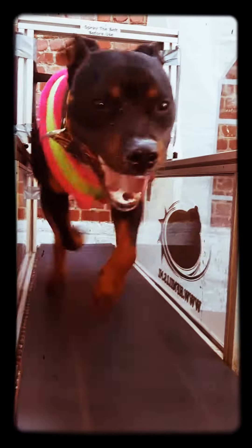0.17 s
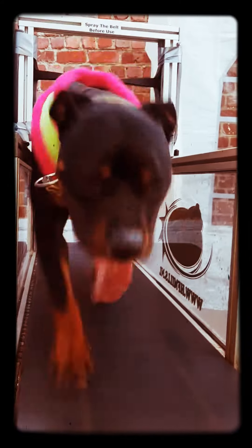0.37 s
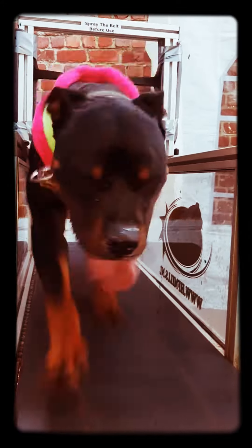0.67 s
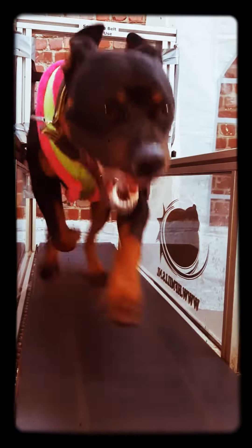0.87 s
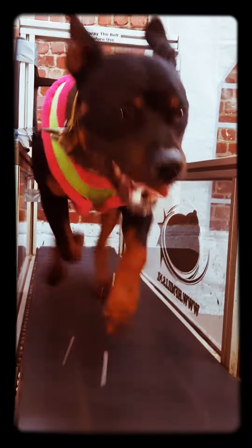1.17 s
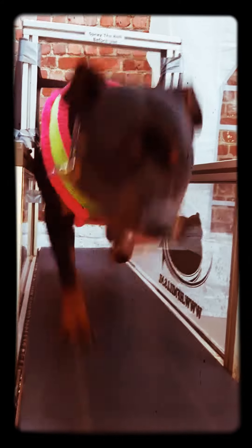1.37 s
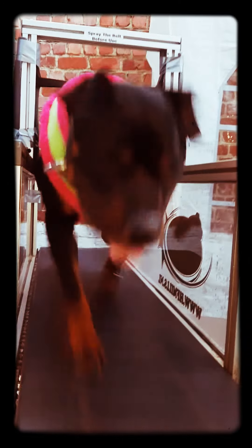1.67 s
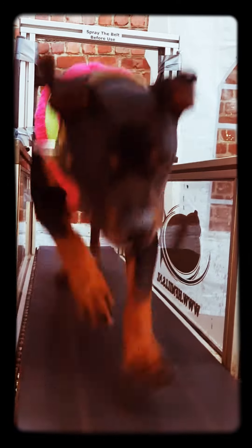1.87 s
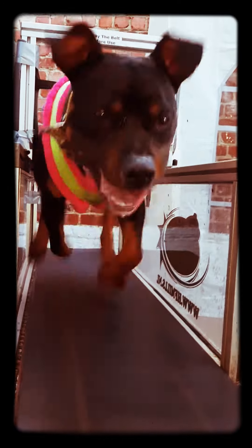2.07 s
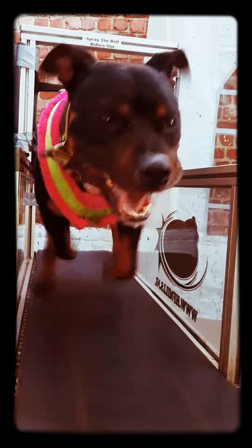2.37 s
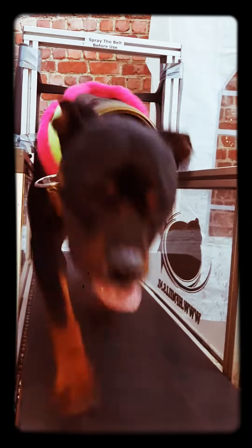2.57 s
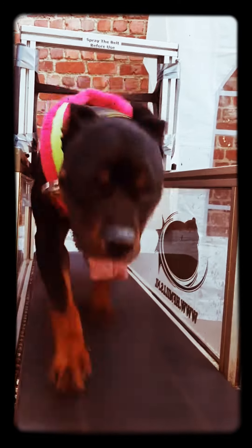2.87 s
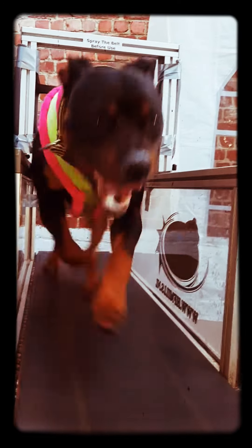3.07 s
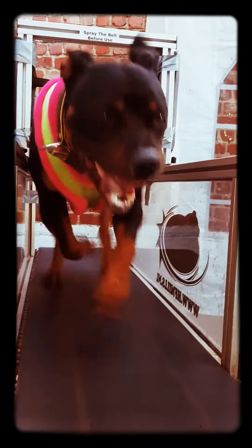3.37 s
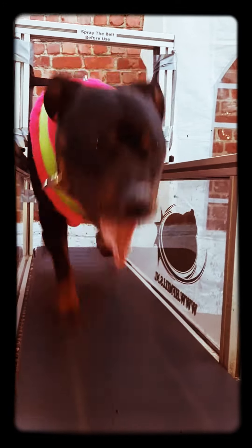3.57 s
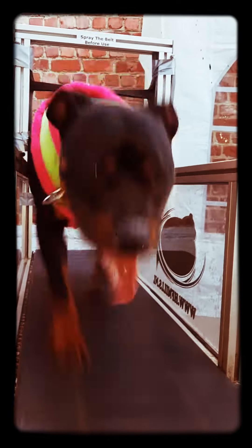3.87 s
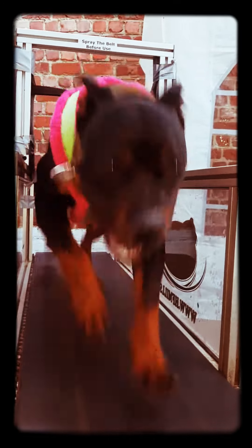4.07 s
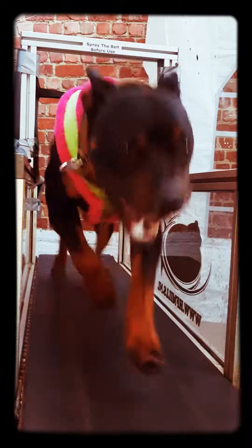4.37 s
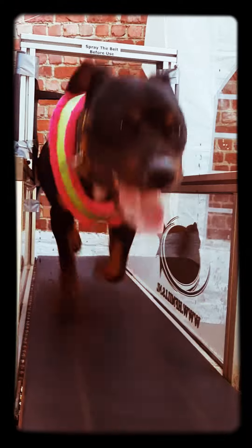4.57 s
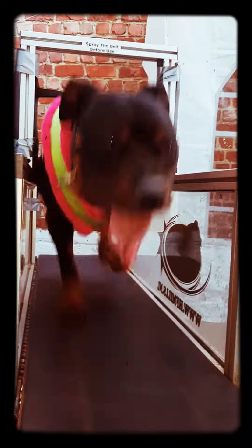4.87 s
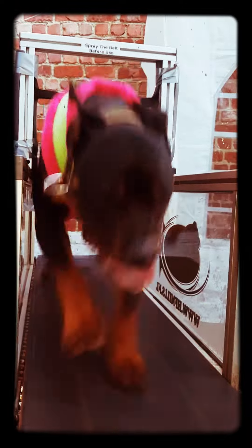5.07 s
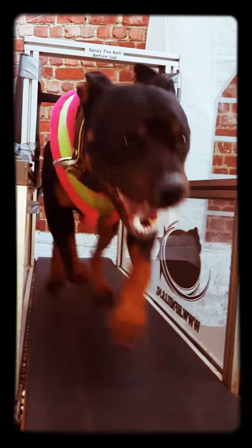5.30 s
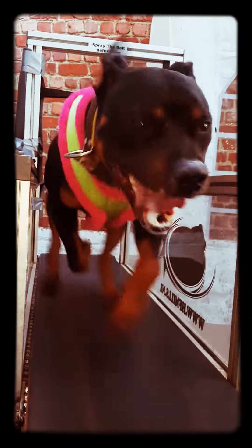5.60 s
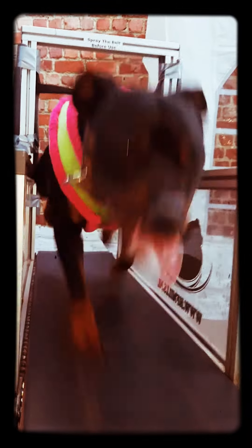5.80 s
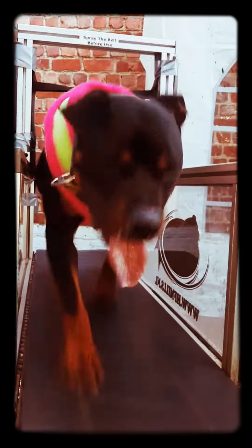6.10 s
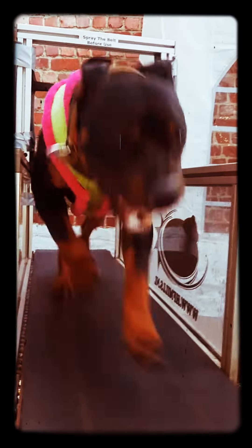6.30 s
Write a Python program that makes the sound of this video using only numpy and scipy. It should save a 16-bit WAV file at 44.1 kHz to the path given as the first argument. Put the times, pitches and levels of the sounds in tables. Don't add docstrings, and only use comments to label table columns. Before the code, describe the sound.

For about 6.4 seconds a dog gallops steadily on a slatted treadmill in a small brick-walled space, close to a phone. The sound is already in full motion at 0 s and never stops. Roughly every 0.3 s a stride surges: low-mid frame drone and wheel hiss build quickly, then fall away as the paws leave. Landings set off dry, bright slat cracks with tiny rattles, plus blunt paw thumps and short scuffs; thumps are prominent between 0.6 and 3 s. Strong clack clusters come around 1.6-2.6 s, the sharpest near 3.9, 4.1-4.2, 4.8 and 5.73 s, where a pad drag also scrapes. Very fast faint ticking fills between. A soft rail ring sounds at 0.4, 2.5 and 3.8 s; a thin high harness jingle flickers often, clearer before 4 s. Faint building rumble, short room tail, little bass; it ends mid-stride.

```python
import sys
import numpy as np
from scipy import signal
from scipy.fft import rfft, irfft
from scipy.io import wavfile
from scipy.ndimage import uniform_filter1d

SR = 44100
rng = np.random.default_rng(int(sys.argv[2]) if len(sys.argv) > 2 else 0)


def wav_record(signal):
    frames = np.transpose(np.atleast_2d(signal))
    bounded = np.clip(frames, -1, 1)
    quanta = np.round(bounded * 32767).astype(np.int16)
    wavfile.write(sys.argv[1], SR, quanta)


def ratio(d):
    e = np.asarray(d, float) / 20
    return 10 ** e


N = 284004
SLAT_HZ, EDGE_RING_HZ = 2725, 5640


def evened(x):
    return x / np.sqrt(np.mean(x ** 2) + 1e-20)


def read(points, hz):
    f, value = np.transpose(points)
    return np.interp(np.log(hz + 1), np.log(f + 1), value)


def colour(points):
    log_gain = np.log(ratio(read(points, abs(np.fft.fftfreq(4096, 1 / SR)))))
    return np.fft.ifft(np.exp(np.conj(signal.hilbert(log_gain)))).real[:1024]


def coloured(x, points):
    return evened(signal.oaconvolve(x, colour(points)[None])[:, :N]) if len(x) else x


def resonate(x, hz, width_hz):
    return signal.lfilter(*signal.iirpeak(hz, hz / width_hz, SR), x)


def filtered(x, order, edge_hz, kind):
    return signal.sosfilt(signal.butter(order, edge_hz, kind, fs=SR, output="sos"), x)


def ports(x, other, least=0):
    # (frequency [Hz], shared power [0-1])
    alike = [(60, 0.6), (250, 0.98), (600, 0.72), (1400, 0.27), (3000, 0), (6500, 0), (9000, 0.34),
             (15000, 0)]
    # (frequency [Hz], phase [radians])
    trail = [(0, 0), (780, .9), (1810, .9), (2500, 2.8), (2930, 3.8), (3900, 4.8), (5250, 5.4), (6980, 6.4),
             (9220, 9.6), (12000, 12.4), (16100, 18)]
    hz = np.fft.rfftfreq(N, 1 / SR)
    share = np.sqrt(np.clip(read(alike, hz), min(least, .99), 1))
    pair = share * rfft(x) + np.sqrt(1 - share ** 2) * rfft(other)
    late = np.exp(-1j * np.interp(hz, *np.transpose(trail)) * np.array([[1], [0]]))
    # (frequency [Hz], level [dB])
    lean = [(100, 1.0), (400, 0.59), (1200, 0.33), (5000, 0), (9000, 0.43)]
    lean_db = read(lean, hz) * np.array([[1], [-1]])
    return irfft(pair * late * ratio(lean_db), N)


def knocks(per_s, spread_db):
    size_db = spread_db * np.minimum(rng.exponential(1, (3, N)), 5)
    size = ratio(size_db) * rng.choice([-1., 1.], (3, N))
    return evened(size * (rng.random((3, N)) < per_s / SR))


def patchy(x, patchy_db):
    z = signal.stft(x, nperseg=512)[2]
    patches = uniform_filter1d(rng.standard_normal(z.shape[1:]), size=5, axis=0)
    patches = uniform_filter1d(patches, size=6, axis=1)
    return signal.istft(z * ratio(patchy_db * evened(patches)), nperseg=512)[1][:, :N]


def slat_rings():
    # (time [s],
    # body level [dB], body pitch [Hz], edge level [dB], edge pitch [Hz])
    strong = [(0.0098, -13.5, 3240, -12.5, 4520), (0.021, -15, 2860, -12.5, 4370),
              (0.0759, -16, 2970, -14.5, 4750), (0.3328, -9, 3100, -9.5, 4850), (0.6621, -9, 3170, -8, 4400),
              (1.3032, -17, 2800, -12, 5840), (1.3917, -11.5, 3000, -12.5, 6200),
              (1.6193, -11, 3820, -11.5, 6330), (1.6843, -10.5, 2700, -12.5, 6640),
              (1.6956, -12, 3010, -11, 6760), (1.9308, -8.5, 3770, -9.5, 4560),
              (1.9413, -13, 2800, -13.5, 5000), (1.9929, -11.5, 3060, -8.5, 5230),
              (2.1921, -11, 2880, -11, 4800), (2.2532, -14, 2710, -10.5, 6330), (2.303, -13, 3500, -14, 4310),
              (2.3135, -9, 3350, -12, 5800), (2.3244, -11.0, 2760, -8, 6600), (2.5257, -16, 3220, -10, 4700),
              (2.6123, -12.5, 3170, -12.0, 4690), (2.6191, -17.0, 3880, -12.5, 4780),
              (2.63, -11.5, 2720, -13.5, 4570), (2.8558, -16, 2950, -11.5, 4500),
              (2.8644, -16, 3080, -12.5, 6460), (2.935, -13, 3140, -12.5, 4690),
              (3.2729, -15.5, 4180, -12.5, 4670), (3.4993, -15, 2800, -18, 4500),
              (3.8071, -11.5, 3040, -8.5, 6100), (3.8188, -10.5, 2840, -14, 4700),
              (3.8798, -6.5, 2900, -6.5, 6720), (3.9036, -12.5, 2880, -11.5, 6400),
              (4.1225, -6, 2900, -7, 5080), (4.1322, -11, 2830, -15, 6440), (4.1953, -7.5, 2800, -10.5, 4610),
              (4.207, -15.5, 3060, -12.5, 5550), (4.5294, -11, 2710, -11, 6430), (4.7802, -7, 3160, -8, 6500),
              (5.7214, -11.5, 2750, -9, 6330), (5.7344, -5, 3460, -6.5, 5060),
              (6.3833, -14.5, 2620, -10.5, 7300),
              (0.0679, -17, 2950, -17.5, 5300), (0.0722, -18.0, 3140, -14, 7190),
            (0.0851, -14.5, 2720, -17.0, 6800), (0.268, -16.5, 2920, -21, 4740),
            (0.4097, -18, 2820, -16.5, 5430), (0.6736, -17, 2860, -16, 4650),
            (0.7529, -15.5, 2930, -13.5, 6600), (0.8059, -14.5, 2830, -14, 6700),
            (1.0594, -16, 2900, -17, 4750), (1.3672, -12.5, 2800, -14.5, 5510),
            (1.6874, -17, 3100, -12.5, 4780), (1.921, -18, 2890, -14.5, 5680),
            (2.265, -16.0, 2890, -22, 6980), (2.307, -18, 4150, -15, 4390),
            (2.5027, -14.5, 2760, -17, 6030), (2.5365, -10.5, 2760, -12, 6500),
            (2.6087, -22, 2840, -13, 4600), (2.7368, -13.5, 2780, -16, 4740),
            (2.8184, -13.5, 2910, -14, 6550), (2.8763, -12.5, 3060, -15.5, 6370),
            (2.9252, -15.5, 3060, -22, 6840), (2.9465, -15.5, 3680, -15, 6240),
            (3.0749, -13.5, 2860, -19, 6700), (3.4388, -16, 2840, -17, 6200), (3.571, -14, 3820, -13, 6760),
            (3.5792, -14, 3830, -15, 5600), (3.8727, -16, 2930, -17.5, 6630),
            (3.8926, -13, 2890, -12.5, 4610), (3.9145, -17, 2800, -17, 6720), (4.113, -20, 3140, -17, 6120),
            (4.3804, -12, 2800, -14.5, 4830), (4.4446, -17, 2950, -15.5, 4310),
            (4.8544, -15.0, 2840, -20.5, 4390), (5.1641, -14.0, 2860, -14, 5430),
            (5.4196, -13.5, 2890, -12, 4420), (5.609, -17, 2790, -19.5, 4460),
            (5.7245, -12, 2800, -13, 5450), (5.746, -25, 2930, -23, 6370),
            (6.1476, -19.5, 2870, -21.0, 4540), (6.3952, -18.5, 2800, -22.0, 4520)]
    # (time [s], body level [dB], edge level [dB])
    ticks = [(0.0987, -20, -16), (0.1638, -18, -20.5), (0.1907, -27, -27), (0.2558, -19.5, -22),
             (0.3244, -19.0, -20), (0.345, -19, -26), (0.4015, -17, -16), (0.4636, -26, -31),
             (0.4765, -21, -23), (0.6557, -23, -23), (0.7231, -22, -32), (0.727, -17, -17.5),
             (0.9088, -27, -34), (1.0029, -17.5, -21.5), (1.0697, -16, -21.5), (1.083, -24, -23.5),
             (1.136, -24.5, -22), (1.1617, -20, -19.5), (1.1744, -29, -26), (1.2664, -31, -33),
             (1.2928, -21, -27), (1.3164, -24, -28.5), (1.3723, -24, -22), (1.3797, -24, -25.0),
             (1.4681, -17, -16), (1.4806, -31, -23), (1.6094, -32, -21), (1.6445, -23, -29.0),
             (1.7073, -16.5, -16), (1.7189, -19.5, -17), (1.7568, -21, -20), (1.7934, -21, -21),
             (1.8815, -23, -30), (1.9145, -26, -18.0), (2.0411, -26, -28), (2.0561, -32, -29.5),
             (2.0681, -30, -26.0), (2.0812, -27, -26), (2.2973, -31, -19.5), (2.3844, -29, -22.5),
             (2.3974, -27, -22.5), (2.4086, -21, -21), (2.445, -33, -32), (2.5149, -20, -23.5),
             (2.5606, -27, -23), (2.5723, -22.0, -26.0), (2.7837, -17, -16.5), (2.7952, -21.0, -21),
             (2.8301, -23, -23.5), (2.9143, -19.0, -16), (2.9824, -28, -30.0), (3.006, -26, -25.5),
             (3.0395, -22, -19), (3.0637, -19.0, -19), (3.1337, -21, -24), (3.1451, -25, -25),
             (3.1564, -36, -29), (3.1665, -36, -31), (3.1766, -30.0, -25), (3.1903, -20, -17.5),
             (3.241, -21, -19), (3.3094, -19.5, -20.5), (3.3566, -25, -31.0), (3.3679, -20.5, -25),
             (3.4034, -21, -19.5), (3.4515, -32, -25), (3.4848, -22.5, -23.5), (3.5104, -21, -24),
             (3.5221, -28.0, -24), (3.5617, -15.5, -18), (3.6424, -27.0, -24), (3.6526, -24, -25),
             (3.6647, -25, -22), (3.6765, -21, -21), (3.6887, -27, -24.5), (3.952, -22, -20),
             (3.9649, -16, -17), (3.988, -19, -21.5), (4.0734, -18, -21), (4.189, -14.5, -17),
             (4.4282, -27, -32.0), (4.4385, -17.5, -23), (4.4563, -17, -22), (4.5136, -31, -19),
             (4.5188, -20, -19), (4.607, -29.0, -33.0), (4.6185, -30.0, -33.5), (4.7053, -24, -21),
             (4.7314, -23.0, -24), (4.7728, -20, -17.5), (4.7926, -28, -24), (4.8348, -15, -16),
             (4.8444, -15, -18.5), (4.9573, -22.5, -24), (5.022, -19.5, -23.5), (5.0859, -22, -20.5),
             (5.1104, -18, -24), (5.1753, -12.5, -14), (5.1868, -23, -19.5), (5.2901, -26.5, -26),
             (5.4308, -30, -24), (5.5843, -31, -37.0), (5.6849, -22, -21.5), (5.712, -31, -29.5),
             (5.7984, -18, -14.5), (5.8096, -17, -21), (5.8231, -19, -25), (5.873, -19.5, -18),
             (5.8986, -21.5, -24), (5.912, -25.0, -29.0), (5.987, -18, -19), (6.0615, -29, -26),
             (6.1283, -18.5, -16.5), (6.1364, -15, -19.5), (6.211, -19.5, -24.5), (6.2224, -18.0, -17),
             (6.2476, -20, -24), (6.26, -26, -22.5), (6.2972, -23, -28), (6.31, -22, -23)]
    edge_spread = 0.18
    light = []
    for k, (s, body_db, edge_db) in enumerate(ticks):
        edge_hz = EDGE_RING_HZ * (1 + edge_spread * np.sin(k * k))
        light.append((s, body_db, SLAT_HZ, edge_db, edge_hz))
    return strong + light


def slat_claps():
    return [(row[0], max(row[1], row[3]) + 5) for row in slat_rings()]


def load_db():
    # (paws off the belt [s], light load [dB], hardest push [s], full load [dB])
    strides = [(-.13, -30, .07, -28.5), (.18, -40.5, .4, -30), (.53, -40.5, .71, -31),
               (.86, -41, 1.06, -31.5), (1.16, -43, 1.35, -29.5), (1.47, -40.5, 1.66, -30),
               (1.771, -40, 1.98, -29), (2.1, -38.5, 2.3, -29), (2.39, -39.5, 2.6, -29),
               (2.709, -37, 2.92, -28.5), (3.01, -41, 3.25, -28.5), (3.32, -40.5, 3.58, -30),
               (3.65, -43, 3.88, -30.5), (3.98, -43, 4.18, -30.5), (4.29, -42.5, 4.53, -32),
               (4.61, -47.5, 4.82, -33), (4.96, -43, 5.17, -32.5), (5.25, -49.5, 5.46, -30.5),
               (5.6, -40.5, 5.79, -30.5), (5.88, -39.5, 6.13, -30), (6.249, -42.5, 6.44, -29)]
    rise_curve, fall_curve = 0.34, 1.64
    jolt_db, jolt_s = 4, 0.0026
    t = np.arange(N) / SR
    last = (strides[-1][2] + .1, strides[-1][1], 9, 0)
    off, light_db, push, full_db = np.transpose(strides + [last])
    k = np.searchsorted(off, t, "right") - 1
    up = np.clip((t - off[k]) / (push[k] - off[k]), 0, 1) ** rise_curve
    down = np.clip((t - push[k]) / (off[k + 1] - push[k]), 0, 1) ** fall_curve
    blows = np.zeros(N)
    for s, db in slat_claps():
        blows[min(round(s * SR), N - 1)] += ratio(db)
    u = np.arange(4000) / SR / jolt_s
    jolt = np.tanh(2 * signal.oaconvolve(blows, u * np.exp(1 - u))[:N])
    rise_db = (full_db[k] - light_db[k]) * up
    fall_db = (light_db[k + 1] - full_db[k]) * down
    return light_db[k] + rise_db + fall_db + jolt_db * (jolt - .3)


def passing():
    gap_s, tick_db, spread_db = 0.0124, -32, 8
    s = np.cumsum(gap_s * rng.uniform(.9, 1.1, size=600))
    s = s[s < N / SR]
    chance = np.minimum(rng.standard_normal(len(s)), 1)
    db = tick_db + 1.0 * (load_db()[(s * SR).astype(int)] + 29) + spread_db * chance
    return list(zip(s, db))


def crack_halves():
    # (frequency [Hz], level [dB])
    crack = [(150, -29), (500, -17.5), (1200, -8.5), (2000, -37), (2700, 8.5), (4500, 16), (7000, 9),
             (8200, -9.5), (12000, -20), (16000, -58)]
    taps = colour(crack)[:256]
    halves = [filtered(taps, 2, 4200, side) for side in ("low", "high")]
    return [half / np.linalg.norm(half) for half in halves]


def clap(body_db, body_hz, edge_db, edge_hz, chance, halves):
    # (delay [s], level [dB])
    echoes = [(.0012, -10), (.0025, -9), (.0045, -14), (.0062, -18)]
    body_t60, edge_t60, ring_rise_s = 0.0044, 0.0031, .0005
    t = np.arange(1500) / SR
    taps = (ratio(body_db) * halves[0] + ratio(edge_db) * halves[1])[None]
    touch = (2 + chance[:3, :40]) * t[:40] * np.exp(-t[:40] / .00003)
    touch = touch / np.linalg.norm(touch, axis=1, keepdims=True)
    hit = np.zeros((3, 1500))
    hit[:, :295] = ratio(16.0) * signal.oaconvolve(touch, taps)
    rings = [(body_db, body_hz, body_t60), (edge_db, edge_hz, edge_t60)]
    for k, (ring_db, hz, t60) in enumerate(rings):
        detune = 1 + .03 * chance[:3, 100 + k, None]
        turn = 2 * np.pi * hz * t * detune + 3 * chance[:3, 110 + k, None]
        hit += ratio(ring_db + 9 - 60 * t / t60) * (1 - np.exp(-t / ring_rise_s)) * np.sin(turn)
    out = hit.copy()
    for k, (s, echo_db) in enumerate(echoes):
        for port in range(3):
            late = round(s * SR * (1 + .2 * np.tanh(chance[3, port + 3 * k])))
            out[port, late:] += ratio(echo_db) * hit[port, :1500 - late]
    rattle_db = -6.5 + .3 * (max(body_db, edge_db) + 12)
    rattle = signal.oaconvolve(chance[4:], taps)[:, :1500] * ratio(rattle_db)
    return out + rattle * (1 - np.exp(-t / .0005)) * ratio(-60 * t / .033)


def claps():
    halves = crack_halves()
    out = np.zeros((3, N + 1500))
    for s, *rings in slat_rings():
        at = round(s * SR)
        out[:, at:at + 1500] += clap(*rings, rng.standard_normal((7, 1500)), halves)
    shapes = []
    for chance in rng.standard_normal((40, 7, 1500)):
        body_hz = SLAT_HZ * (1 + .2 * abs(chance[3, 99]))
        edge_hz = EDGE_RING_HZ * (1 + .08 * chance[3, 98])
        shapes.append(clap(-25, body_hz, -28, edge_hz, chance, halves))
    for k, (s, db) in enumerate(passing()):
        at = round(s * SR)
        out[:, at:at + 1500] += ratio(db + 20) * shapes[k % 40]
    out = filtered(out, 1, 300, "high")
    return ports(out[0, :N], out[1:, :N], least=0.82)


def snaps():
    snap_db, growth = -5.5, 1.7
    out, t = np.zeros((3, N + 200)), np.arange(200) / SR
    for s, db in slat_claps():
        at = round(s * SR)
        burst = rng.standard_normal((3, 200)) * np.exp(-t / .0008)
        out[:, at:at + 200] += ratio(snap_db + growth * db) * burst
    out = filtered(out, 2, [7500, 14000], "band")
    return ports(out[0, :N], out[1:, :N])


def chatter():
    # (frequency [Hz], width [Hz], level [dB])
    slats = [(2250, 160, -3), (2530, 220, 0), (2900, 200, 2)]
    drive = knocks(per_s=630, spread_db=1.0)
    modes = sum(ratio(db) * resonate(drive, hz, width_hz) for hz, width_hz, db in slats)
    x = evened(modes) * ratio(-44.5 + 3.3 * (load_db() + 33))
    return ports(x[0], x[1:])


def paw_blows(rows, t60, rise_s, width_hz, gain_db):
    out, t = np.zeros((3, N + 3000)), np.arange(3000) / SR
    fade = np.cos(np.pi / 2 * t / t[-1])
    for s, db, hz in rows:
        grit = evened(resonate(rng.standard_normal((3, 3000)), hz, width_hz))
        at = round(s * SR)
        swell = ratio(db + gain_db - 60 * t / t60) * (1 - np.exp(-t / rise_s))
        out[:, at:at + 3000] += grit * swell * fade
    return ports(out[0, :N], out[1:, :N])


def paws():
    # (time [s], level [dB], pitch [Hz])
    thumps = [(0.076, -31, 500), (0.264, -13, 503), (0.551, -19, 358), (0.661, -9.5, 420),
              (0.704, -35, 450), (0.993, -7.5, 500), (1.056, -12, 444), (1.208, -29, 433),
              (1.299, -8.5, 393), (1.631, -4.5, 400), (1.69, -9, 404), (1.76, -19, 392), (1.911, -6, 396),
              (1.948, -8.5, 476), (2.129, -30, 358), (2.241, -12, 285), (2.298, -16, 312),
              (2.434, -36, 361), (2.481, -25, 304), (2.537, -9.5, 404), (2.616, -26, 566),
              (2.814, -29, 374), (2.91, -9, 392), (3.035, -38, 301), (3.081, -18, 404), (3.446, -17, 439),
              (3.496, -15, 537), (3.557, -40, 668), (3.748, -32, 382), (4.105, -18, 410), (4.838, -30, 410),
              (5.419, -12, 320), (5.621, -18, 366), (6.08, -11.5, 516), (6.303, -15.5, 310),
              (6.39, -30, 500)]
    scuffs = [(0.0712, -22, 1320), (0.3184, -29, 1240), (0.401, -23, 2090), (0.6552, -32, 1220),
              (0.9905, -36, 1560), (1.058, -34, 1330), (1.3016, -25, 1850), (1.685, -29, 1650),
              (1.917, -39, 2200), (1.9916, -21, 2100), (2.2435, -33, 1680), (2.5245, -19.5, 2300),
              (2.8724, -32, 2150), (3.477, -43, 1580), (3.564, -33, 2230), (3.8006, -25.5, 1340),
              (4.121, -30, 1310), (4.196, -27, 1300), (4.4927, -40, 1500), (4.778, -31, 1640),
              (5.4076, -45, 1240), (5.721, -40, 1450), (5.8212, -27.5, 1440), (5.914, -35, 1430),
              (6.1222, -28, 1630), (6.3824, -22, 1340)]
    drags = [
        (.72, -34.5, 2260),
        (1.02, -34.5, 2300),
        (2.2, -46, 1100),
        (2.27, -35, 1100),
        (5.33, -44, 1370),
        (5.745, -33, 1380),
    ]
    thuds = paw_blows(thumps, t60=0.095, rise_s=0.0032, width_hz=150, gain_db=-11.5)
    thuds = filtered(thuds, 3, 210, "high")
    scuffing = paw_blows(scuffs, t60=0.14, rise_s=0.0034, width_hz=910, gain_db=-0.5)
    dragging = paw_blows(drags, t60=0.46, rise_s=0.0064, width_hz=480, gain_db=9.0)
    return thuds + scuffing + dragging


def drone():
    # (frequency [Hz], width [Hz], level [dB])
    frame = [(290, 14, -33), (316, 9.5, 7), (385, 22, 7), (488, 33, 3.5), (575, 10, -1), (723, 97, 1),
             (865, 83, -2), (1100, 14, -8)]
    # (frequency [Hz], level [dB])
    rumble = [(30, -50), (120, -19.5), (195, -14), (228, -2.5), (400, 0.5), (900, -6.5), (1500, -8.5),
              (2500, -13.5), (5000, -31.5)]
    drive = knocks(per_s=2500, spread_db=2.0)
    broad = coloured(drive, rumble)
    modes = evened(sum(ratio(db) * resonate(drive, hz, width_hz) for hz, width_hz, db in frame))
    x = evened(patchy(broad + ratio(-5.5) * modes, patchy_db=1.5)) * ratio(load_db() + 1.5)
    return ports(x[0], x[1:])


def wheels():
    # (frequency [Hz], level [dB])
    hiss = [(800, -19), (1900, -1), (2700, 5.5), (4000, 7.5), (7000, 4), (8000, -2.5), (9500, -5.5),
            (12500, -0.5), (15500, -14)]
    # (frequency [Hz], level [dB])
    idling = [(6000, -15), (9000, -1), (10500, -1.5), (12500, 0.5), (14500, 1.5), (15800, -3)]
    hiss_db = -36 + 0.66 * (load_db() + 32.5)
    drive = 0.8 * rng.standard_normal((3, N)) + 0.6 * knocks(per_s=2200, spread_db=5.5)
    loaded = evened(patchy(signal.oaconvolve(drive, colour(hiss)[None])[:, :N], patchy_db=3.0))
    idle = coloured(rng.standard_normal((3, N)), idling)
    x = loaded * ratio(hiss_db + 3.5) + idle * ratio(-43.5 + 0.16 * (hiss_db + 47.0))
    return ports(x[0], x[1:])


def rail():
    # (time [s], level [dB])
    landings = [
        (.117, -35.5),
        (.394, -26.5),
        (1.288, -34.5),
        (1.682, -34),
        (2.537, -27.5),
        (2.811, -41),
        (2.919, -35),
        (3.559, -32.5),
        (3.821, -31.5),
    ]
    rail_hz, rise_s, t60 = 923, 0.0047, 0.094
    t, blows = np.arange(9000) / SR, np.zeros(N)
    for s, db in landings:
        blows[round(s * SR)] = ratio(db + 8.0)
    ring = np.sin(2 * np.pi * rail_hz * t) * (1 - np.exp(-t / rise_s)) * ratio(-60 * t / t60)
    x = signal.oaconvolve(blows, ring)[:N]
    return ports(x, np.array([x, x]))


def jingle():
    # (time [s], level [dB])
    harness_jolts = [(.126, -34), (0.298, -27), (.635, -36), (.894, -41), (.94, -34), (1.061, -40),
                     (1.224, -43), (1.264, -33), (1.837, -34), (1.893, -27), (2.215, -27), (2.522, -27),
                     (2.91, -43), (3.107, -34), (3.464, -34), (3.727, -31), (3.794, -37), (4.085, -38),
                     (4.826, -47), (5.099, -53), (5.339, -36), (5.422, -36), (6.078, -42), (6.409, -43)]
    # (frequency [Hz], level [dB], t60 [s])
    ring_modes = [(10416, 0, .07), (10576, -2, .045)]
    t, x = np.arange(5000) / SR, np.zeros(N)
    touches = ratio(-47.0) * knocks(per_s=500, spread_db=4.0)[:2] * np.sqrt(120 / SR)
    for s, db in harness_jolts:
        for bounce, (u, v) in enumerate(rng.random((5, 2))):
            lean_db = 4.9 * (2 * v - 1) * np.array([1, -1])
            at = min(round((s + bounce * (.02 + .016 * u)) * SR), N - 1)
            touches[:, at] = ratio(db + 1.0 - 4.8 * bounce + lean_db)
    for touch, (hz, db, t60) in zip(touches, ring_modes):
        ring = ratio(db - 60 * t / t60) * np.sin(2 * np.pi * hz * t) * (1 - np.exp(-t / 0.0022))
        x += signal.oaconvolve(touch, ring)[:N]
    return np.array([x, 0.77 * x])


def room(x, t60):
    taps = np.zeros((2, 12000))
    at = np.arange(500, 11980, 20) + rng.integers(0, 20, (2, 574))
    np.put_along_axis(taps, at, rng.choice([-1., 1.], at.shape), axis=1)
    taps = taps * ratio(-60 * np.arange(12000) / SR / t60)
    return signal.fftconvolve(x, taps / np.linalg.norm(taps[0]), axes=1)[:, :N]


def air():
    x = filtered(rng.standard_normal((3, N)), 1, [40, 170], "band")
    x = ratio(-56.5 + 1.0 * (load_db() + 34.0)) * evened(x)
    return ports(x[0], x[1:])


def scene():
    hits = claps()
    wet = ratio(-13) * room(hits, t60=.15)
    slats = hits + wet + snaps() + chatter()
    return slats + paws() + drone() + wheels() + rail() + jingle() + air()


def low_pass(x):
    return signal.sosfilt(signal.butter(12, 16510, fs=SR, output="sos"), x)


def record(dry):
    thin = filtered(dry, 1, 150, "high")
    flattened = np.clip(thin, -.88, .88)
    mix = signal.oaconvolve(flattened, signal.firwin(255, 15850, fs=SR)[None], "same")
    return low_pass(mix)


dry = scene()
out = record(dry)
wav_record(out)
```